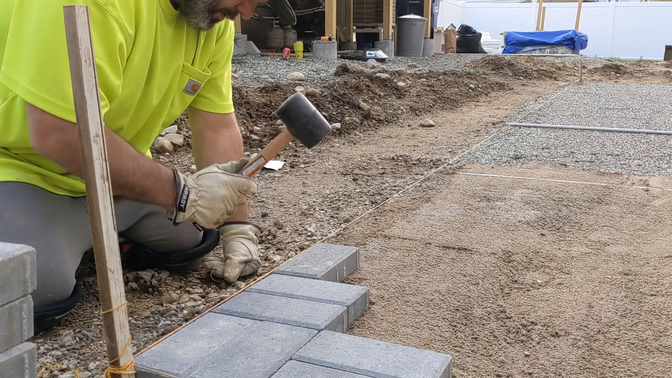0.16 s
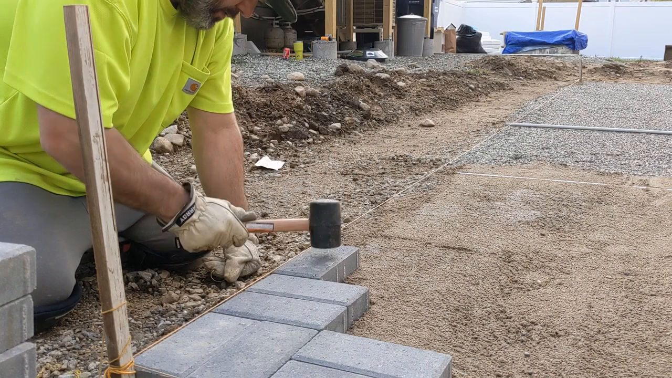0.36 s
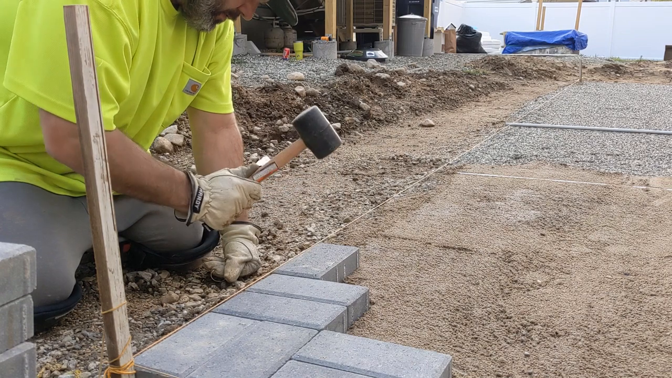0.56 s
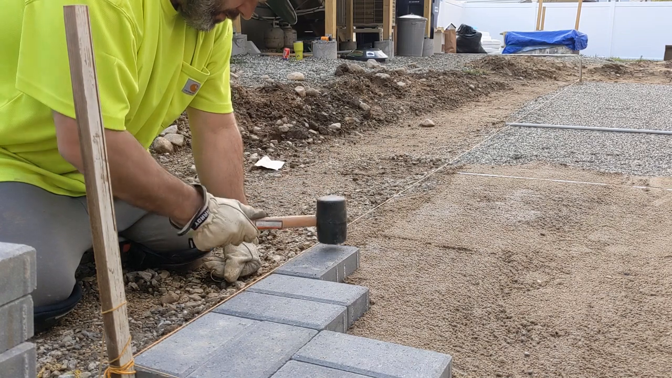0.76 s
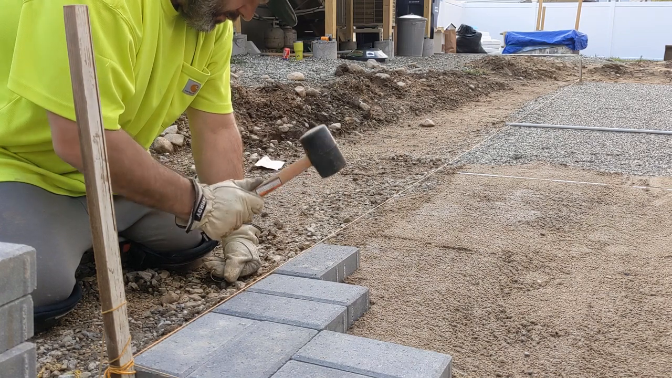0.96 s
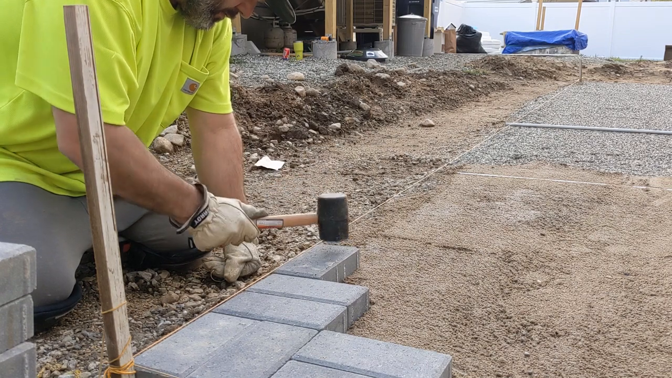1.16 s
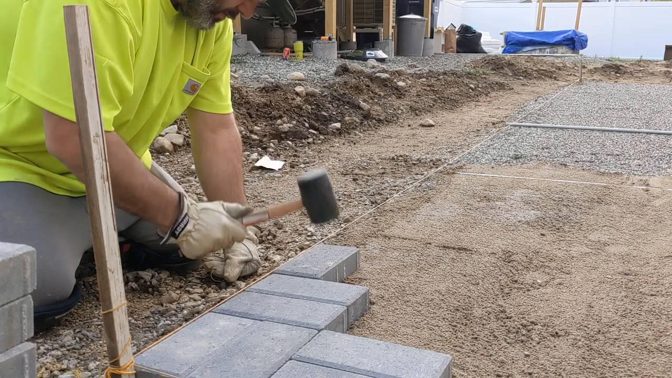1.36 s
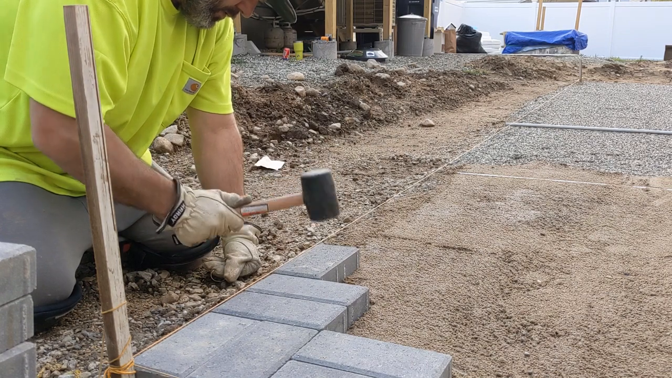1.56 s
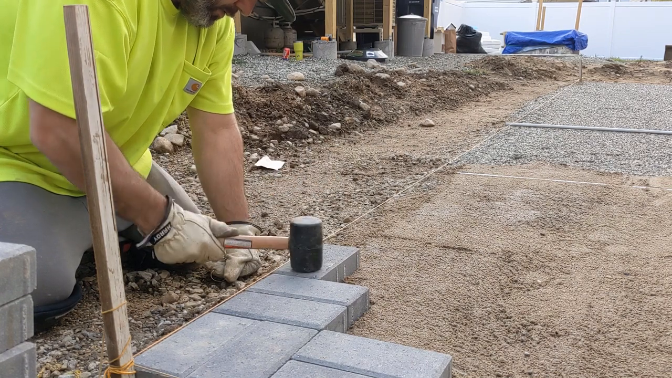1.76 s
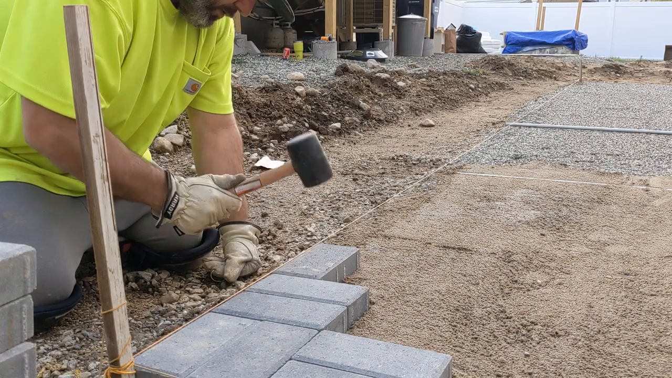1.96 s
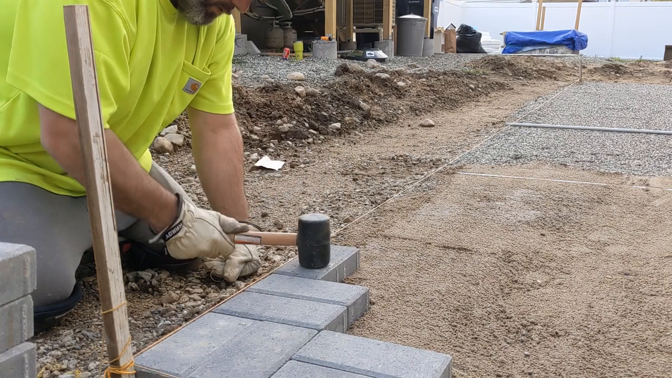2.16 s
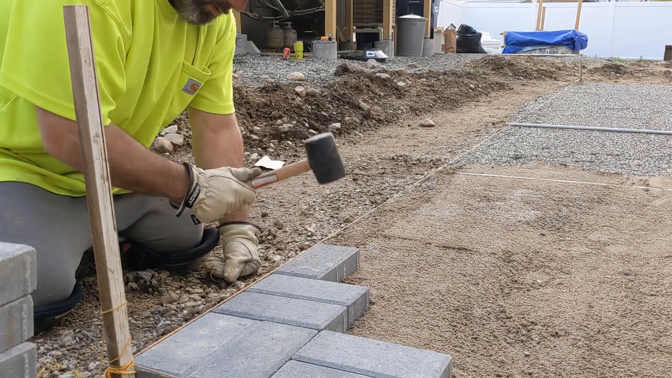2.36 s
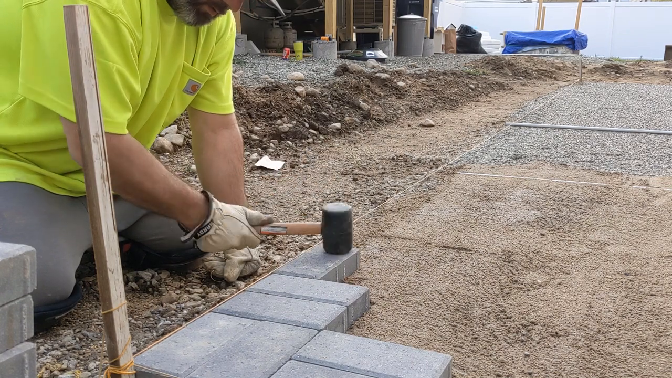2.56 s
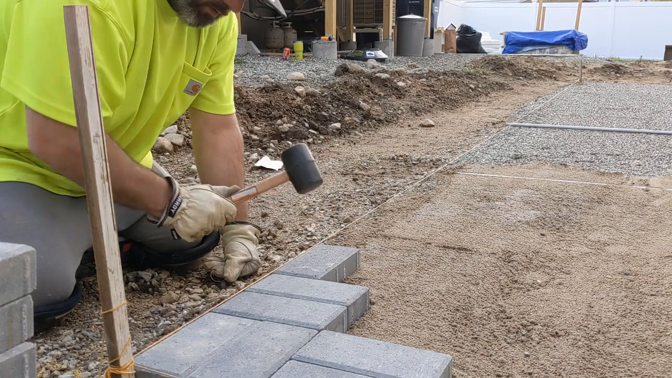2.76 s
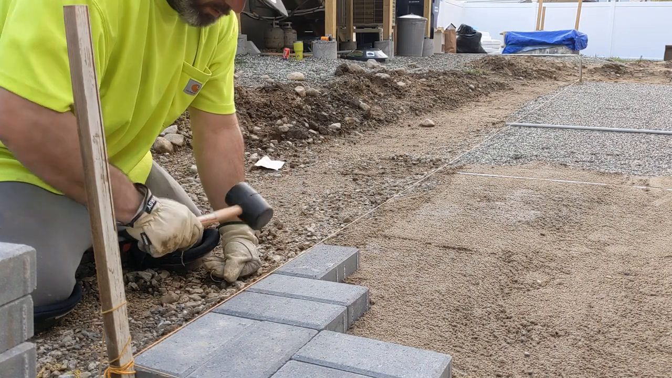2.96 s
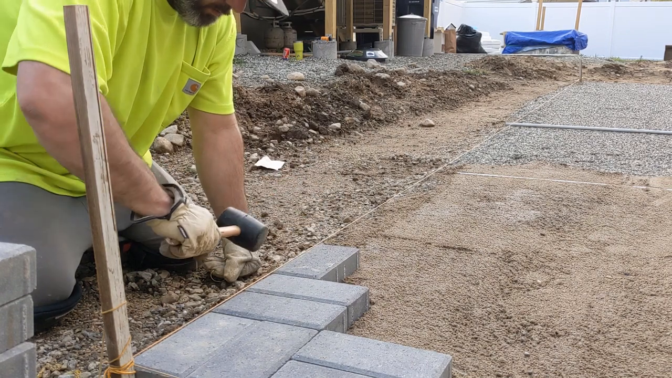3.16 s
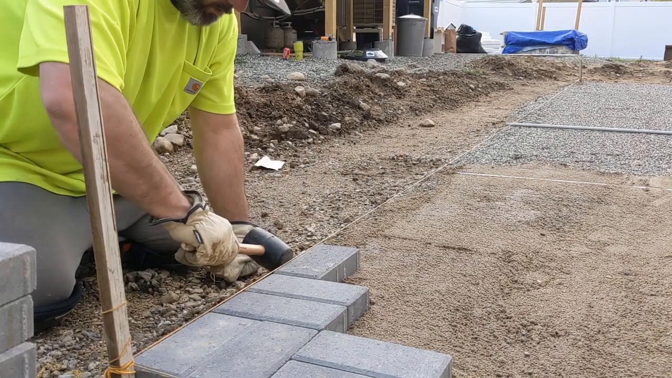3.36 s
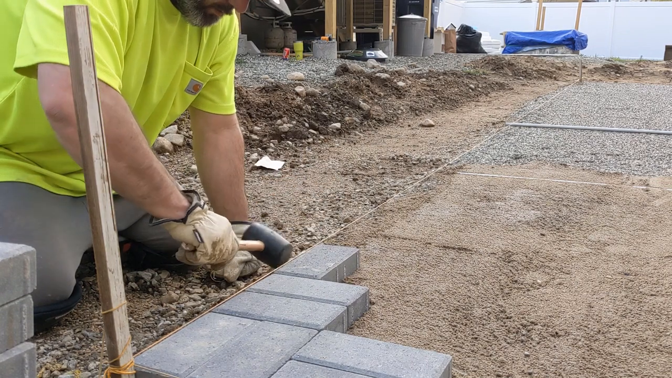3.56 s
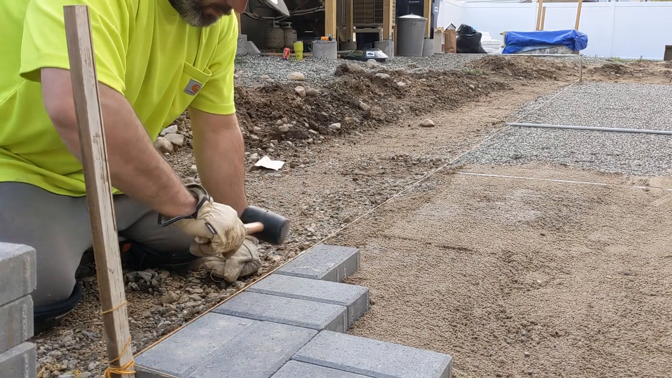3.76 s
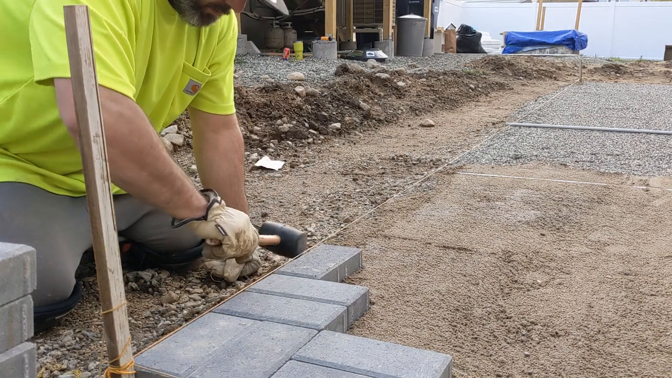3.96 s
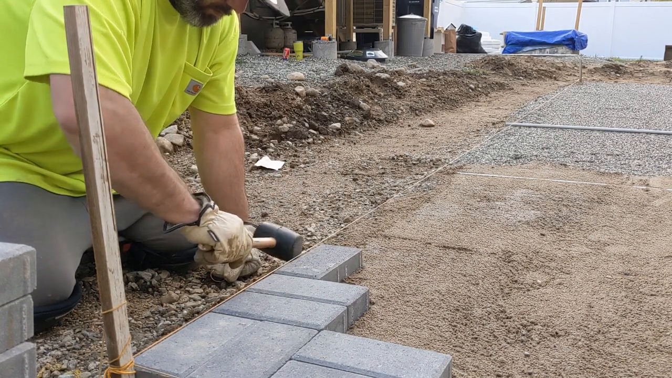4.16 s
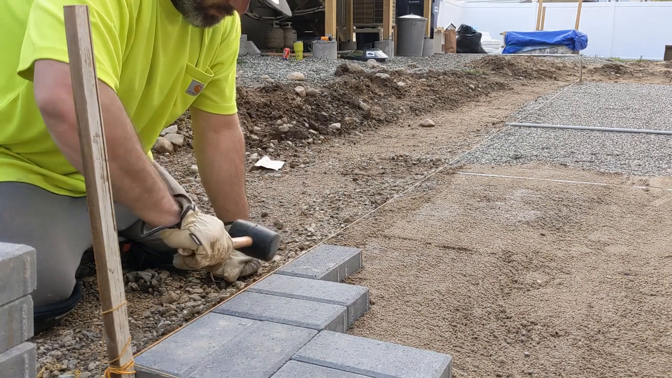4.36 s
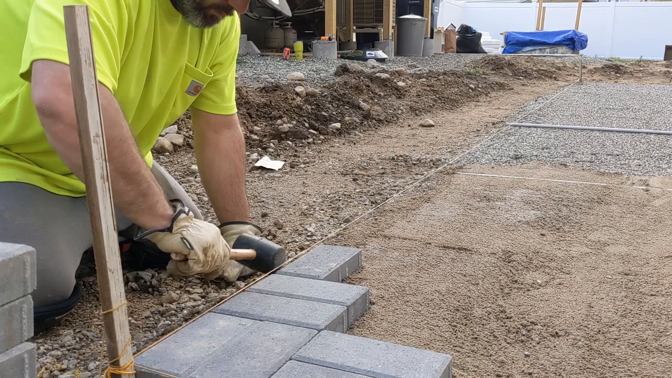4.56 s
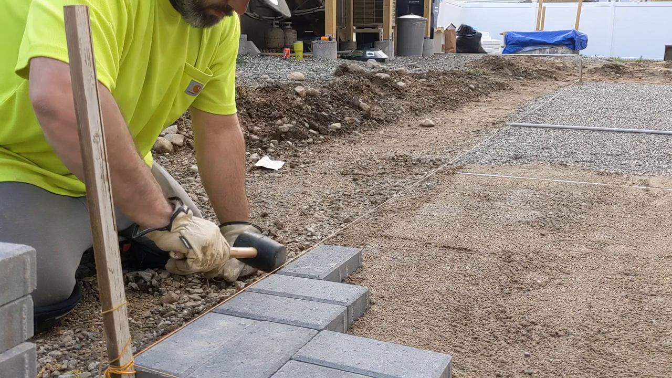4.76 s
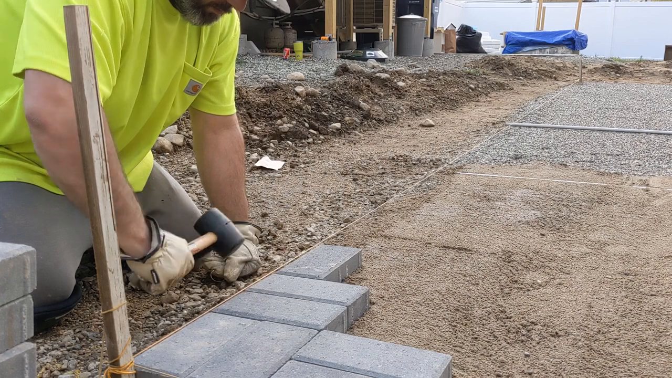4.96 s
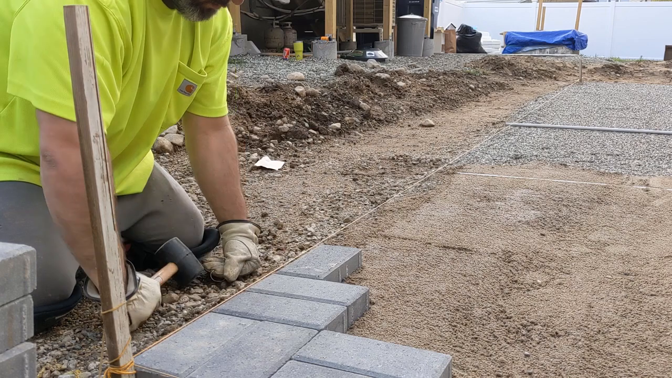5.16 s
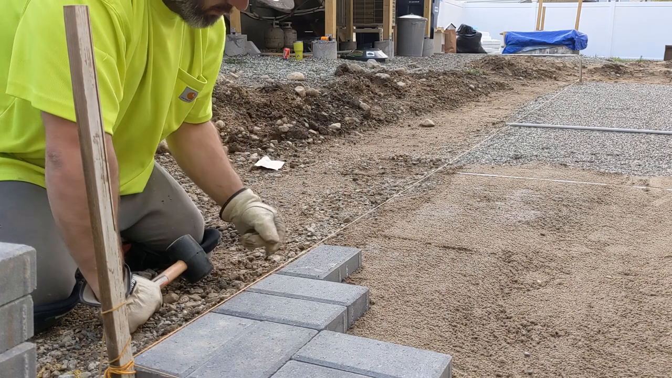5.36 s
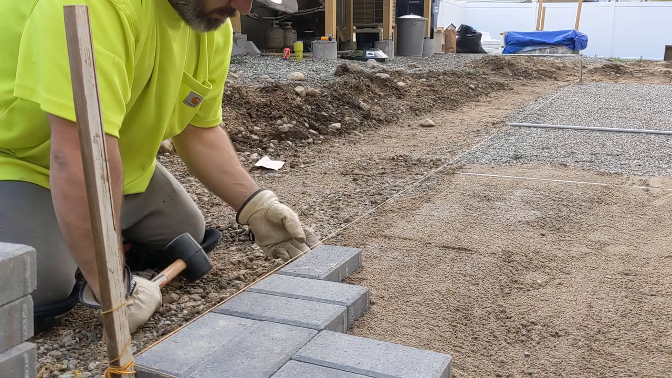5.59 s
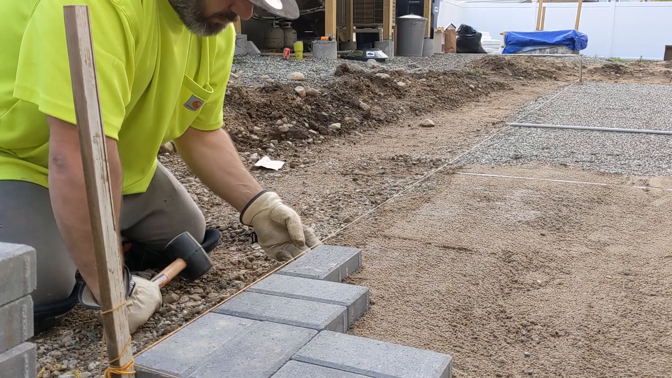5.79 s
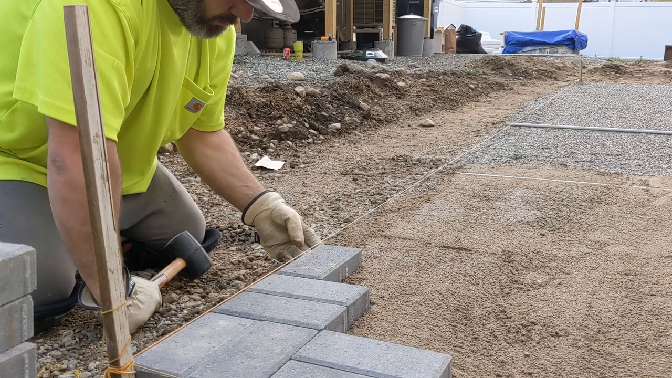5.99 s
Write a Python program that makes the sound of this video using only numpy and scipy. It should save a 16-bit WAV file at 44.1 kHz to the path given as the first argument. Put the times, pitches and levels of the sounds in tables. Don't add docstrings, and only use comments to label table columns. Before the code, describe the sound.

Close phone pickup in an open yard beside a house. From the very start, a rubber mallet hits a concrete paver bedded in sand: eight loud blows at about 0.0, 0.4, 0.8, 1.2, 1.5, 1.9, 2.3 and 2.7 s. Each is a short, hollow, mid-low thud with a bright crack and barely audible falling sand, answered by quick dull wall echoes. A tiny grit click comes near 3.0. Much softer, duller taps follow at 3.5, 3.7 and 4.0, the last the firmest, then a faint double tap at 4.6. At 5.25 a crisp gritty tick begins light glove rubbing and scattered grains until about 5.6, with a final faint touch at 5.8. Low traffic rumble and drone gently swell throughout, with thin wavering machine squeals far away, around 0.6-1.2 and 3.7-4.6, and lower faint notes after 4.8, ending near 6 s.

```python
import sys
import numpy as np
from scipy import signal
from scipy.fft import rfft, irfft
from scipy.io import wavfile
from scipy.ndimage import uniform_filter1d

SR = 44100
rng = np.random.default_rng(int(sys.argv[2]) if len(sys.argv) > 2 else 0)


def gain_from_db(level_db):
    decades = np.asarray(level_db, float) / 20
    return 10 ** decades


def bounce(signal):
    frames = np.transpose(np.atleast_2d(signal))
    limited = np.clip(frames, -1, 1)
    pcm = np.round(limited * 32767).astype(np.int16)
    wavfile.write(sys.argv[1], SR, pcm)


N = 265923

# (time [s], swell [dB])
TRAFFIC_SWELL = [(0, -2.5), (.9, -0.5), (1.4, 1), (2.4, 1.5), (3.0, 0), (3.45, 0.5), (3.85, -2.5),
                 (4.2, -1.5), (5.2, 1), (6.03, 0.5)]
# (frequency [Hz], level per Hz [dB])
HUM_COLOUR = [(13, -56.5), (26, -40), (58, -3), (150, -16), (196, -5.5), (230, -8), (361, -18.5),
              (403, -19.5), (806, -24), (952, -24.5), (1330, -29), (2800, -30), (5000, -40), (6800, -39.5),
              (9750, -44), (15200, -59), (16500, -64.5)]
# (frequency [Hz], likeness [-1..1])
LEFT_RIGHT_LIKENESS = [(60, 1), (130, 0.93), (290, 0.053), (640, 0.081), (1410, 0.18), (3100, -0.095),
                       (6820, 1), (15000, 0.9)]

BLOW_TIMES = [.0078, .4275, .8188, 1.1815, 1.5407, 1.8824, 2.2585, 2.7132]
# (level [dB], pace [ratio], crack [dB], sand [dB])
HARD_BLOWS = [(-2.5, 0.93, 1.5, -52.5), (-1.5, 1.01, 0, -52), (-2.5, 1.0, 1.5, -53), (0, .99, 1, -53.5),
              (-0.5, 1.0, -1.5, -55.5), (-0.5, 0.981, 0.5, -54.5), (-1.5, 1.01, 1, -53),
              (0, 1.02, -3.5, -55.5)]
TAP_TIMES = [3.4721, 3.7357, 4.0043, 4.6036, 4.6268, 5.2542, 5.8125]
# (level [dB], pace [ratio], crack [dB], sand [dB])
SOFT_TAPS = [
    (-25.5, 0.94, -8, -50),
    (-21.5, 1.07, -9, -44.5),
    (-16, 1.16, -9, -48),
    (-29, 1.08, -2, -49),
    (-37, 2.9, -18, -54),
    (-35, 0.71, -14, -49.5),
    (-46.5, 0.51, -20.5, -56),
]
# (gain [ratio], ring [kHz], extra early turns [rad / 2 pi], stiffening [ms],
# contact [ms], lift-off [ms], slab rise [ms], bass cut [Hz], crack lead [ms])
HARD_HEAD = (2.65, .48, .47, 1.22, 1.84, .85, 8, 134, 0)
SOFT_HEAD = (1.52, .28, .9, 1.15, 2.89, 1, .13, 160, .6)
# (frequency [Hz], signed gain [ratio], 60 dB fade [ms], side share [ratio])
SLAB_MODES = [(98, .46, 45, .03), (216, -.6, 30, .05), (302, -1.79, 22, .03), (550, 1.68, 18, .14),
              (975, -1.61, 12, .6)]
# (frequency [Hz], signed gain [ratio], 60 dB fade [ms], side share [ratio])
EDGE_MODES = [(94, 1.26, 49, .05), (143, -1.36, 28, .05), (256, .05, 60, .1), (554, 1.16, 11, .1)]
# (frequency [Hz], level per Hz [dB])
CRACK_COLOUR = [(900, -25), (1500, -3.5), (2100, 2), (3000, -0.5), (4200, -7.5), (5200, -5.5), (6500, -0.5),
                (9000, -7), (10500, -13), (12000, -19.5), (14000, -25.5), (16800, -37.5)]
# (frequency [Hz], level per Hz [dB])
GRAIN_COLOUR = [(300, -23.5), (800, -9), (2000, -10), (3500, -13.5), (5000, -11), (6500, -6), (9000, -13),
                (11000, -21), (14000, -26.5), (16500, -31.5)]
# (frequency [Hz], lead [rad])
PORT_LEAD = [(0, 0), (430, .2), (1120, .9), (2070, 1.1), (3000, 1.6), (4300, 1.7), (6500, 2.1), (7800, 4.3),
             (11500, 5.2), (14500, 5.7), (16500, 6.2)]
# (frequency [Hz], level [dB])
PORT_LEVEL = [(60, 0), (2200, -.5), (3100, 1.5), (6000, .4), (8300, -5), (11000, 5.5), (16000, 5)]

WALL_DELAYS = [35.5, 41, 55, 71, 95, 129.5, 148, 185]
# (level [dB], ring [Hz], ring width [Hz], treble [dB])
WALL_ECHOES = [(-32.5, 410, 530, -47), (-22, 200, 250, -53), (-26, 225, 245, -53), (-34.5, 180, 430, -52),
               (-25.5, 480, 150, -44.5), (-36.5, 279.6, 1300, -47.5), (-45, 1100, 900, -56),
               (-55.5, 600, 600, -58)]
# (frequency [Hz], level [dB])
YARD_COLOUR = [(40, -7.5), (120, 8), (250, 5), (400, -2.5), (600, -6), (900, 0), (1300, 0.5), (2200, -8.5),
               (5000, -12.5), (16800, -25)]

# (time of peak [s], level [dB])
BEARING_TURNS = [(0.586, -64.5), (0.871, -63), (1.165, -65), (3.936, -61.5), (4.245, -62), (4.575, -60.5)]
# (start [s], length [s], first pitch [Hz], last pitch [Hz], level [dB])
FAR_NOTES = [(.1, .24, 1876, 1790, -77.5), (.35, .05, 1758, 1860, -73), (0.602, .2, 1700, 1680, -77),
             (.73, 0.088, 1830, 1850, -72), (.62, .15, 2190, 2170, -85), (2.44, .16, 2820, 2810, -81),
             (2.85, 0.1, 2700, 2660, -74), (3.147, .08, 2690, 2700, -80), (3.808, 0.089, 4050, 4000, -66.5),
             (3.901, 0.18, 4020, 4050, -80), (4.36, 0.22, 1400, 1370, -78), (4.68, 0.3, 1900, 1890, -80),
             (4.757, .25, 1645, 1650, -84.5), (5.0, .11, 1600, 1490, -76), (4.8, 0.15, 815, 800, -73.5),
             (4.82, 0.17, 465.5, 490, -73), (5.299, 0.091, 905, 923, -62), (5.376, 0.13, 935, 950, -67.5),
             (5.501, 0.169, 937, 884, -68.5), (5.62, .16, 965, 950, -80)]
# (start [s], length [s], first pitch [Hz], last pitch [Hz], level [dB])
FAR_SLIDES = [(1.06, .05, 4380, 3850, -69.5), (1.35, .055, 4600, 3850, -73),
              (2.515, 0.045, 4300, 4010, -72), (3.732, 0.022, 3070, 3020, -60),
              (3.785, .03, 2600, 4000, -74), (3.787, .022, 4170, 6400, -62),
              (3.795, 0.051, 5860, 6850, -68), (3.83, 0.026, 6600, 5600, -71),
              (3.835, .05, 3990, 3240, -72.5), (0.257, 0.063, 4500, 3850, -71.5),
              (4.62, .03, 5150, 5000, -75)]

# (time [s], level [dB], pitch [Hz])
GRIT_CLICKS = [(2.983, -47, 4260), (3.2314, -67.5, 3610), (3.4665, -41, 6560), (4.0012, -42, 8740),
               (4.0333, -45.5, 7670), (4.1061, -49, 3730), (4.1505, -46, 6020), (4.5933, -48, 7690),
               (5.2528, -23.5, 6700), (5.2656, -28.5, 6010), (5.2988, -40, 4060), (5.3256, -39, 4240),
               (5.3395, -44, 5040), (5.3531, -45, 6030), (5.3813, -54.5, 6100), (5.4157, -54, 5890),
               (5.421, -44, 5080), (5.4741, -37, 4620), (5.4927, -50.5, 8070), (5.5008, -41, 4470),
               (5.5278, -50, 4740), (5.536, -53, 8070), (5.545, -43, 7110), (5.5617, -56.5, 7030),
               (5.5844, -59, 3710), (5.7846, -47, 5190), (5.8102, -43.5, 3650)]
# (time of peak [s], peak [dB], rise over 20 dB [ms], fall over 20 dB [ms])
GLOVE_STROKES = [(3.472, -50, 11, 7), (4.153, -57, 9.2, 12), (4.24, -70.5, 30, 120), (4.604, -51, 35, 45.5),
                 (5.254, -27, 2, 26.5), (5.345, -50.5, 80, 90), (5.42, -54.5, 40, 100),
                 (5.495, -58.5, 68, 98), (5.545, -63.5, 50, 100), (5.812, -61, 83, 28),
                 (5.885, -66, 44, 30), (5.94, -66, 10, 23)]


def shape(table, length, low=0, high=1e9):
    hz = np.arange(length // 2 + 1) * SR / length + 1e-3
    f, db = np.transpose(table)
    gain = gain_from_db(np.interp(np.log(hz), np.log(f), db, -120, -120))
    return gain * (hz >= low) * (hz < high)


def colour(x, table, low=0, high=1e9):
    y = irfft(rfft(x) * shape(table, x.shape[-1], low, high), x.shape[-1])
    return y / np.sqrt(np.mean(y ** 2))


def causal(x, table):
    cepstrum = irfft(np.log(shape(table, 1024) + 1e-3))
    fold = np.r_[1, 2 * np.ones(511), 1, np.zeros(511)]
    taps = irfft(np.exp(rfft(cepstrum * fold)))[:400]
    return signal.lfilter(taps / np.sqrt(np.sum(taps ** 2)), 1, x)


def band(x, hz, width_hz):
    return signal.lfilter(*signal.iirpeak(hz, hz / width_hz, SR), x)


def walk(rate, channels=1):
    k = int(SR / rate)
    held = np.repeat(rng.standard_normal((channels, N // k + 1)), k, axis=1)
    return 1.3 * uniform_filter1d(uniform_filter1d(held, k), k)[:, :N]


def add(track, s, x):
    i = int(s * SR)
    track[:, i:i + x.shape[-1]] += x[..., :N - i]


def ports(x):
    log_hz = np.log(np.arange(len(x) // 2 + 1) * SR / len(x) + 1)

    def at_bins(table):
        f, value = np.transpose(table)
        return np.interp(log_hz, np.log(f + 1), value)

    half = gain_from_db(at_bins(PORT_LEVEL) / 2) * np.exp(.5j * at_bins(PORT_LEAD))
    both = irfft(rfft(x) * np.array([half, 1 / half]), len(x))
    return both * (np.arange(len(x)) < len(x) - 200)


def air():
    swell = np.interp(np.arange(N) / SR, *np.transpose(TRAFFIC_SWELL))
    settle = .24 * (np.arange(N) - N / 2) / SR
    rumble_db = -59 + swell
    drone_db = -60 + .55 * swell - settle
    hiss_db = -64.5 + .5 * swell - settle
    f, like = np.transpose(LEFT_RIGHT_LIKENESS)
    log_hz = np.log(np.arange(N // 2 + 1) * SR / N + 1)
    like = np.clip(np.interp(log_hz, np.log(f), like), -.95, .98)
    mid, side = rfft(rng.standard_normal((2, N))) * np.sqrt([1 + like, 1 - like])
    noise = irfft([mid + side, mid - side], N)
    out = np.zeros((2, N))
    for db, low, high in ((rumble_db, 0, 160), (drone_db, 160, 330), (hiss_db, 330, 17000)):
        out += colour(noise, HUM_COLOUR, low, high) * gain_from_db(db + .54 * walk(9.1))
    return out


def blow(head, modes, pace, crack_db, sand_db):
    gain, khz, early, stiff, contact, lift, rise, cut, lead = head
    port_lag = 3.5
    clock = (np.arange(12000) - np.array([[0], [port_lag]])) / SR * 1000
    ms = pace * np.maximum(clock - lead, 0)
    squash = 1 - np.exp(-ms / stiff)
    touching = 1 / (1 + np.exp(np.minimum((ms - contact) / lift, 50)))
    out = -gain * squash * touching * np.sin(2 * np.pi * (khz * ms + early * squash))
    for hz, size, t60, side in modes:
        angle = 2 * np.pi * hz * (1 + .01 * rng.standard_normal()) * ms / 1000
        swell = size * gain_from_db(.8 * rng.standard_normal())
        swell = swell * (1 - np.exp(-ms / rise)) * gain_from_db(-60 * ms / t60)
        out = out + swell * (np.sin(angle) + side * np.cos(angle) * [[1], [-1]])
    out = signal.lfilter(*signal.butter(2, cut, "high", fs=SR), out)
    ms = clock[0]
    fade = .12 * np.exp(-ms / .18) + .07 * np.exp(-ms / 3.5) + .001 * np.exp(-ms / 8)
    rattle = rng.standard_normal(len(ms)) * fade
    click = -1.25 * (ms == 0)
    crack = ports(np.roll(causal(rattle + click, CRACK_COLOUR), 4))
    fall = np.clip((ms - 31) / 9, 0, 1) * (np.exp(-(ms / 62) ** 4) + .6 * np.exp(-ms / 140))
    grains = gain_from_db(2.8 * rng.exponential(size=len(ms)))
    sand = colour(rng.standard_normal(out.shape) * grains, GRAIN_COLOUR)
    return out + gain_from_db(crack_db) * crack + gain_from_db(sand_db) * fall * sand


def knocks():
    out = np.zeros((2, N))
    hard = BLOW_TIMES, HARD_BLOWS, HARD_HEAD, SLAB_MODES
    soft = TAP_TIMES, SOFT_TAPS, SOFT_HEAD, EDGE_MODES
    for times, table, head, modes in (hard, soft):
        lead_s = head[-1] / 1000
        for s, (db, *touch) in zip(times, table):
            add(out, s - lead_s, gain_from_db(db) * blow(head, modes, *touch))
    return out


def yard(x):
    out = np.zeros((2, N))
    treble = signal.lfilter(*signal.butter(2, [1500, 6500], "band", fs=SR), x)
    for ms, (db, hz, width_hz, treble_db) in zip(WALL_DELAYS, WALL_ECHOES):
        dull = band(band(x.mean(axis=0), hz, width_hz), hz, width_hz)
        add(out, ms / 1000, gain_from_db(db) * dull + gain_from_db(treble_db) * treble)
    level_db, t60_s = -68, .86
    t = np.arange(SR) / SR
    tail = rng.standard_normal((2, SR)) * gain_from_db(-60 * t / t60_s) * np.clip((t - .014) / .012, 0, 1)
    near = gain_from_db(-2) * np.clip((.078 - t) / .008, 0, 1)
    far = gain_from_db(-.5) * np.clip((t - .095) / .02, 0, 1)
    mid, side = tail * (.17 + near + far) * gain_from_db(1.8 * walk(120)[0, :SR])
    tail = causal(np.array([mid + .8 * side, mid - .8 * side]), YARD_COLOUR)
    return out + gain_from_db(level_db) * signal.fftconvolve(x, tail, axes=1)[:, :N]


def squeal_paths():
    turn_hz, scoop_hz, scoop_s, scoop_db = 2615, 2310, .16, -11.5
    swell_s, drop_s, drop_db = .048, .062, -11
    linger_s, linger_db_per_s = .38, 26
    for s, db in BEARING_TURNS:
        scoop_path = [scoop_hz, turn_hz - 170, turn_hz - 80]
        yield [s - scoop_s, s - swell_s, s], scoop_path, db + scoop_db + np.array([-3, 0, -3])
        times = s + np.array([-swell_s, 0, drop_s, linger_s])
        pitch = turn_hz + np.array([-90, 1.5, -10.5, -25])
        yield times, pitch, db + np.array([drop_db, 0, drop_db, drop_db - linger_db_per_s * linger_s])
    arch_db = 8.5
    part = np.array([0, .3, 1])
    for s, length, first_hz, last_hz, db in [*FAR_NOTES, *FAR_SLIDES]:
        pitch = first_hz + (last_hz - first_hz) * part
        yield s + length * part, pitch, db - arch_db * np.array([.5, 0, 1])


def squeals():
    out = np.zeros((2, N))
    waver = 2.3 * walk(90, channels=2)
    throb = 3.0 * walk(60, channels=2)
    for s, hz, db in squeal_paths():
        t = np.arange(s[0], s[-1], 1 / SR)
        start = rng.integers(N // 2)
        own = slice(start, start + len(t))
        edge = np.clip(np.minimum(t - s[0], s[-1] - t) / .01214, 0, 1)
        angle = 2 * np.pi * np.cumsum(np.interp(t, s, hz)) / SR + waver[:, own]
        level = gain_from_db(np.interp(t, s, db) + 6.5 + throb[:, own])
        add(out, s[0], edge * level * np.sin(angle))
    blur = rng.standard_normal((2, SR // 4)) * gain_from_db(-60 * np.arange(SR // 4) / SR / .25)
    blur = signal.lfilter(*signal.butter(2, 4200, fs=SR), blur)
    return out + gain_from_db(-28.0) * signal.fftconvolve(out, blur, axes=1)[:, :N]


def glove():
    t = np.arange(N) / SR
    out = np.zeros((2, N))
    grains = gain_from_db(2.8 * rng.exponential(size=N) + 3.5 * walk(220))
    rub = colour(rng.standard_normal((2, N)) * grains, GRAIN_COLOUR)
    for s, db, rise, fall in GLOVE_STROKES:
        away = np.maximum((s - t) / rise, (t - s) / fall)
        out += rub * gain_from_db(db - 5 - 19100 * away)
    t = t[:600]
    for s, db, hz in GRIT_CLICKS:
        burst = rng.standard_normal(600) * np.exp(-np.abs(t - .001) / .0007) * (t > .001)
        click = band(band(burst, hz, 1.2 * hz), 7100, 7000)
        add(out, s - .001, gain_from_db(db + 1.5) * ports(click))
    return out


def scene():
    background = air()
    near = knocks()
    return background + near + yard(near) + squeals() + glove()


def low_pass(x):
    return signal.sosfilt(signal.butter(12, 16860, fs=SR, output="sos"), x)


def record(dry):
    top = .99
    hiss = gain_from_db(-87.5) * np.diff(rng.standard_normal((2, N + 1)))
    held = dry / (1 + (np.abs(dry) / top) ** 8) ** (1 / 8)
    return low_pass(held + hiss)


dry = scene()
out = record(dry)
bounce(out)
```